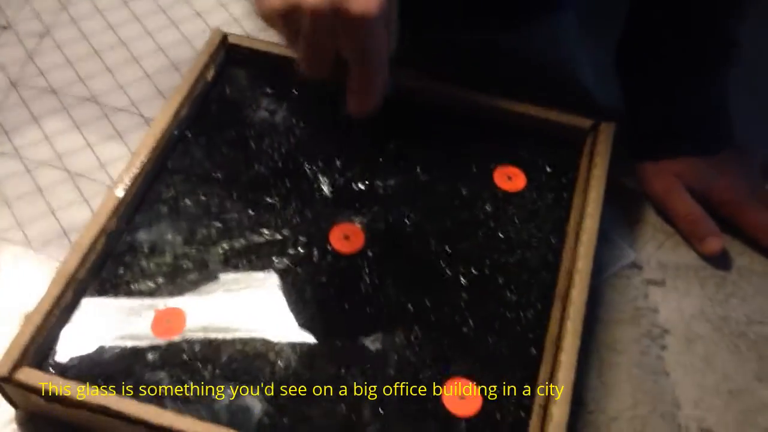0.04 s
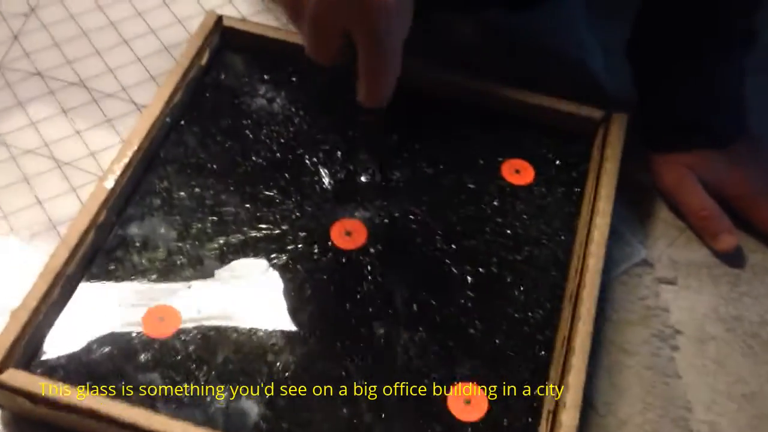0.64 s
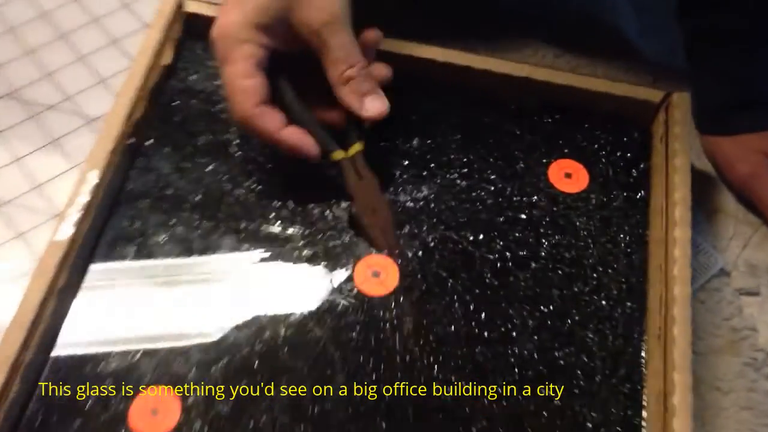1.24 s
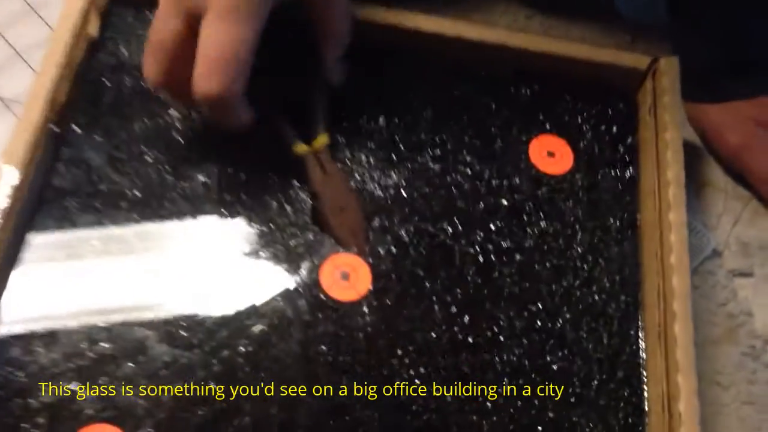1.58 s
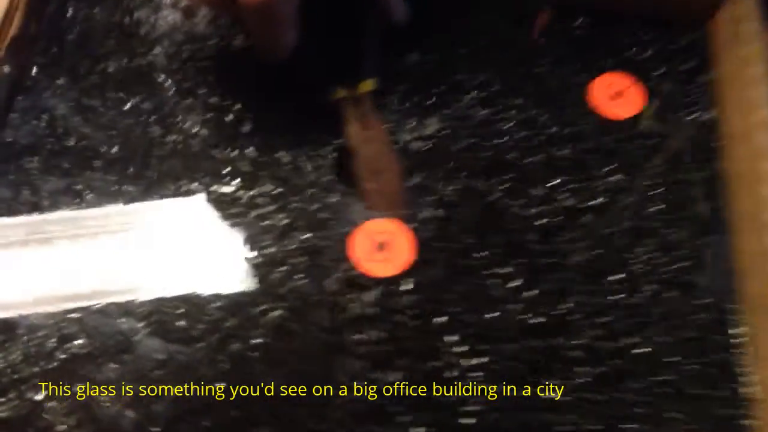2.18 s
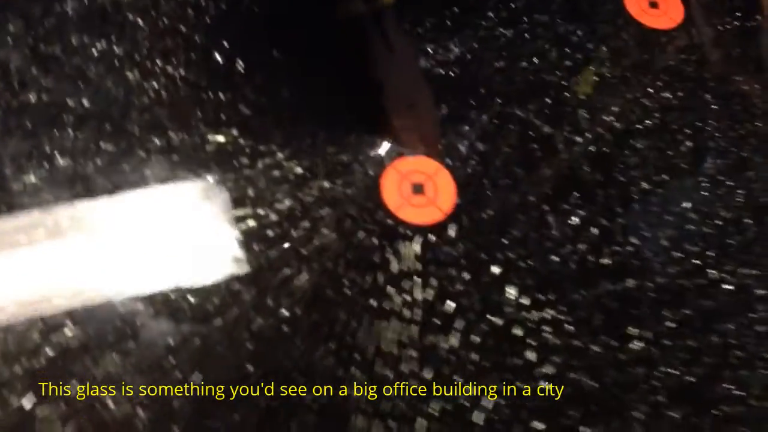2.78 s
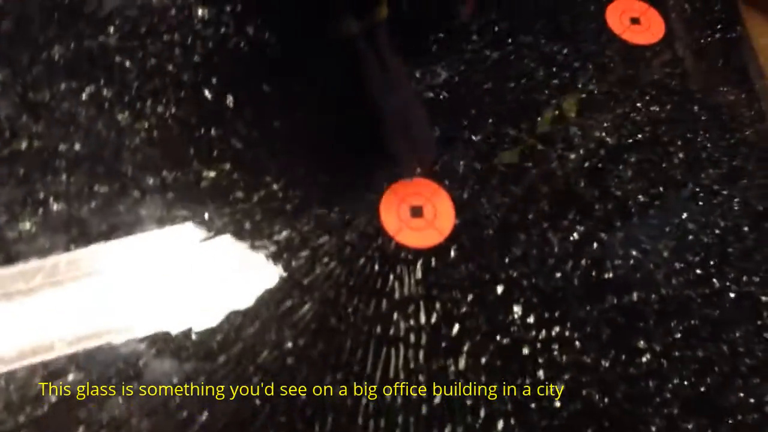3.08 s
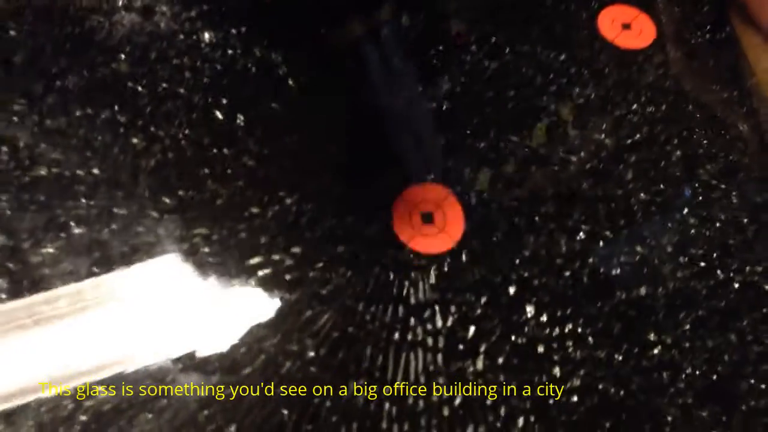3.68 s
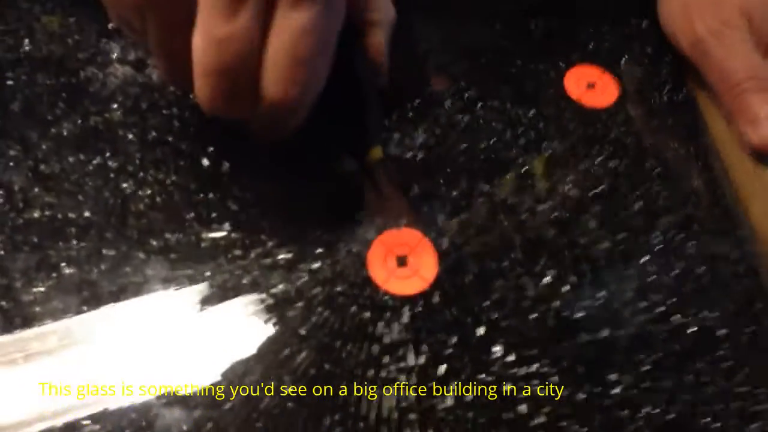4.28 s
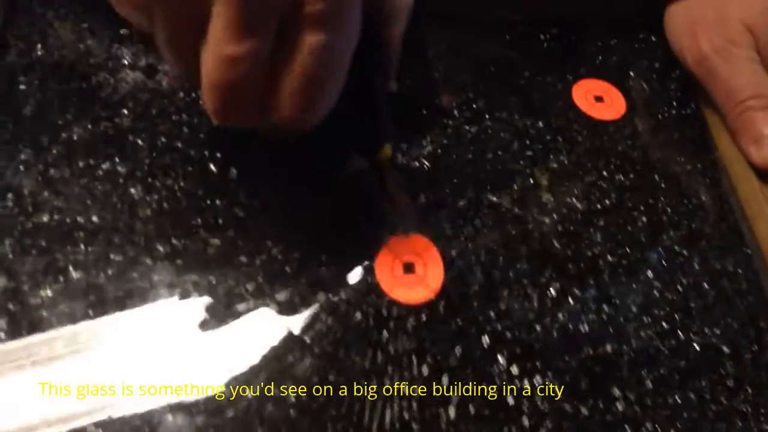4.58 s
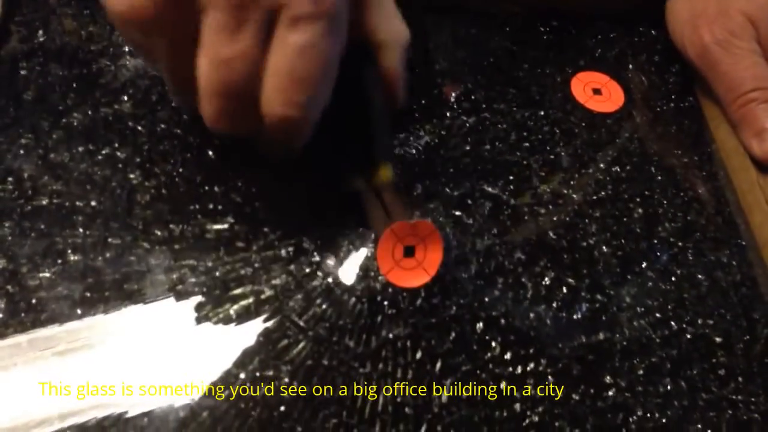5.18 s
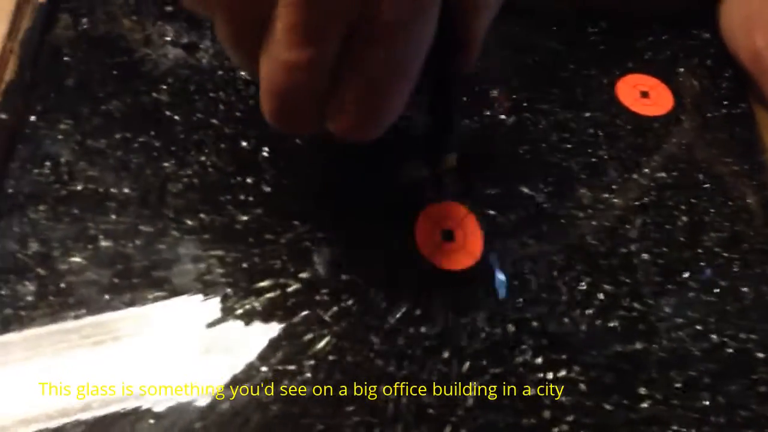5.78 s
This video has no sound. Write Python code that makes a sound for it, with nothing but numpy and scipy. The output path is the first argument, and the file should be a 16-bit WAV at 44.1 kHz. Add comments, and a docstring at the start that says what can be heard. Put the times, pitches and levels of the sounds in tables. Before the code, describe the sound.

In a quiet indoor space, close to the microphone, pliers pry at a sheet of cracked safety glass. First come several knocks and clicks, then softer taps. The metal then bites in and squeaks briefly, and crumbs of glass grind and crackle in uneven strokes. Small fragments keep breaking off with sharp snaps, each giving the pane a short thump, over a low steady hush.

```python
"""Pliers pick at a pane of shattered safety glass in a wooden tray, close by in a quiet, dry room.
First the jaws knock on the pane: each impact excites its modes, and a hard push rocks the tray.
Then they are twisted into it. Stick-slip friction makes the steel creak and squeak, crumbs grind
and fizz, and single pieces snap by brittle fracture, each snap thumping the whole pane."""
import sys
import numpy as np
from scipy import signal
from scipy.fft import rfft, irfft, next_fast_len
from scipy.io import wavfile

SR = 44100
rng = np.random.default_rng(int(sys.argv[2]) if len(sys.argv) > 2 else 0)


def bounce(signal):
    """Save signal as a 16-bit WAV file at the path given by the first command-line argument."""
    frames = np.transpose(np.atleast_2d(signal))
    limited = np.clip(frames, -1, 1)
    pcm = np.round(limited * 32767).astype(np.int16)
    wavfile.write(sys.argv[1], SR, pcm)


N = 266359
THUMP_HZ = 268.5  # lowest mode of the pane in its tray

# Higher modes of pane and pliers. Each row: frequency in Hz, relative level in dB,
# decay time in seconds before damping by the jaws.
HIGHER_MODES = [(733.7, 19.5, 0.031), (822.6, 14.5, 0.028), (1290, 10, 0.0083), (1560, 12, 0.013),
                (1735, 8.5, 0.048), (2050, 6.5, 0.03), (2490, 8, 0.02), (3370, 0.5, 0.005),
                (4350, -0.5, 0.013)]
# Spectrum of the crackle as heard, with the microphone's peak near 11 kHz.
# Each row: frequency in Hz, relative level in dB.
CRACKLE_SPECTRUM = [(1000, 4), (3000, -7), (4400, -6), (5600, -12.5), (7300, -9), (8800, -1.5),
                    (10800, 5.5), (12500, -0.5), (14500, -6), (16000, -14)]


def amp(db):
    return 10 ** (np.asarray(db) / 20)


def unit(x):
    return x / np.sqrt(np.mean(x ** 2) + 1e-20)


def peaked(x):
    return x / abs(x).max()


def add(mix, start, sound):
    part = mix[max(round(start * SR), 0):][:len(sound)]
    part += sound[:len(part)]


def colour(x, spectrum, size=4096):
    """Minimum-phase filter: clicks take on the spectrum and keep their sharp front."""
    hz, db = np.transpose(spectrum)
    log_hz = np.log(abs(np.fft.fftfreq(size, 1 / SR)) + 1)
    log_gain = np.log(amp(np.interp(log_hz, np.log(hz), db)))
    response = np.fft.ifft(np.exp(np.conj(signal.hilbert(log_gain)))).real
    return signal.fftconvolve(x, response[:size // 2])[:len(x)]


def wander(length, hz):
    """Random fluctuation: low-passed noise of rms 1."""
    size = next_fast_len(length, real=True)
    spectrum = rfft(rng.standard_normal(size)) / (1 + (np.fft.rfftfreq(size, 1 / SR) / hz) ** 4)
    return unit(irfft(spectrum, size)[:length])


def ring(x, hz, decay_s):
    """Resonance at a steady or drifting pitch: shift down to zero, smooth twice, shift back."""
    phase = 2 * np.pi * np.cumsum(hz * np.ones(len(x))) / SR
    carrier = np.exp(1j * phase)
    pole = np.exp(-np.log(1000) / (decay_s * SR))
    envelope = signal.lfilter([(1 - pole) ** 2], [1, -2 * pole, pole ** 2], x / carrier + 1e-18)
    return (carrier * envelope).real


def blow(thump_db, clack_db, crack_db, hz, t60, top_hz, chatter_db, size=5000):
    """Impulse response: the contact cracks, the higher modes clack and the lowest mode thumps."""
    t = np.arange(size) / SR
    rise_s, contact_s, crack_s, crumble_s = 0.002, 0.00072, 0.00046, 0.022
    swing = np.sin(2 * np.pi * hz * t) * (1 - np.exp(-(t / rise_s) ** 2)) * amp(-60 * (t / t60) ** 1.25)
    thump = signal.lfilter(*signal.butter(3, 125, "high", fs=SR), swing)  # small panes radiate little bass
    crumble = np.exp(-t / crumble_s)  # loose pieces go on chattering
    contact = rng.standard_normal(size) * (peaked(t * np.exp(-t / contact_s)) + amp(chatter_db) * crumble)
    modes = sum(amp(db) * unit(ring(contact, mode_hz * rng.uniform(0.927, 1.05), 0.34 * decay_s))
                for mode_hz, db, decay_s in HIGHER_MODES)  # damped by the firm contact
    clack = signal.lfilter(*signal.butter(4, top_hz, fs=SR), modes)
    burst = peaked(t * np.exp(-t / crack_s)) + amp(-15) * crumble
    crack = colour(rng.standard_normal(size) * burst, CRACKLE_SPECTRUM)
    return amp(thump_db) * peaked(thump) + amp(clack_db) * peaked(clack) + amp(crack_db) * peaked(crack)


def knocks(t60=0.042, hard_db=-11.5):
    """Free vibration: the jaws strike the pane, a softer contact than a break, so the clack is duller."""
    # Each row: start in seconds, thump, clack and crack levels in dB, pitch of the struck spot in Hz.
    impacts = [(0.0, -22, -30.5, -50, 270), (0.1492, -24, -32, -49, 673), (0.196, -9, -23.5, -25, 270),
               (0.449, -8.5, -26, -18.5, 268.5), (0.527, -24, -65, -56, 271), (1.01, -28, -24, -44, 267),
               (1.031, -19, -54, -30, 310), (1.195, -18, -33.5, -42, 264), (1.238, -15.5, -31, -57, 271),
               (1.256, -20.5, -30.5, -58, 321), (1.362, -31, -26.5, -36, 261),
               (1.488, -17, -35, -30.5, 310), (1.503, -19.5, -23.5, -52, 291), (1.515, -18, -56, -54, 282),
               (1.704, -29.5, -36.5, -37, 245), (1.744, -25.5, -36, -41, 315), (2.057, -27, -42, -45, 210),
               (2.244, -22, -29, -39, 292), (2.256, -21, -28.5, -49, 283)]
    out = np.zeros(N)
    for start, thump_db, clack_db, crack_db, hz in impacts:
        rebound = amp(0.63 * max(thump_db - hard_db, 0))  # jaws that bounce clear leave a longer ring
        ring_s = t60 * (THUMP_HZ / hz) ** 1.2 * rebound  # higher spots die faster
        add(out, start, blow(thump_db, clack_db, crack_db, hz, ring_s, top_hz=1760, chatter_db=-15.5))
    return out


def reflections(x, t60=0.12, per_s=3000, size=12000):
    """Reverberation: echoes from the table and walls merge into a short tail."""
    t = np.arange(size) / SR
    echoes = rng.standard_normal(size) * (rng.random(size) < per_s / SR)
    response = echoes * (t > 0.004) * amp(-60 * t / t60)
    return signal.fftconvolve(x, response / np.linalg.norm(response))[:N]


def background_hush():
    """Broadband noise: a steady hush, strongest in the bass, with a microphone hiss peak near 10 kHz."""
    # Each row: frequency in Hz, relative level in dB.
    spectrum = [(40, -10), (140, 0.5), (300, -7.5), (500, -14.5), (1000, -20.5), (3000, -27), (8000, -27.5),
                (10200, -18), (13000, -21), (15000, -27.5)]
    return amp(-55) * unit(colour(rng.standard_normal(N), spectrum))


def whine(hz=901):
    """Harmonic series: a camera whines faintly on unsteady upper multiples of one pitch."""
    noise = rng.standard_normal(N)
    return amp(-65.5) * unit(sum(k ** 2 * ring(noise, k * hz, 0.03) for k in range(7, 13)))


def rocking(top_hz=90, fade_s=0.034, size=12000):
    """Damped motion: a hard push rocks the tray on the table with a dull rumble."""
    # Each row: start in seconds, peak level in dB.
    pushes = [(0.2, -29), (2.588, -33), (5.497, -46)]
    out, t = np.zeros(N), np.arange(size) / SR
    for start, db in pushes:
        add(out, start, amp(db) * peaked(wander(size, top_hz) * np.sqrt(t) * np.exp(-t / fade_s)))
    return out


def ticks(size=4000):
    """Brief contacts have wide spectra: ticks and scuffs that hardly move the pane."""
    # Each row: start in seconds, peak level in dB, fade in seconds, low edge in Hz.
    contacts = [(0.2385, -12.5, 0.0028, 200), (0.266, -20.5, 0.0025, 80), (0.313, -31.5, 0.0025, 100),
                (0.454, -18.5, 0.018, 150), (0.4921, -15, 0.0014, 1210), (2.33, -28, 0.0065, 297),
                (2.432, -36.5, 0.0071, 300), (3.773, -31, 0.0041, 1200)]
    # Each row: frequency in Hz, relative level in dB.
    spectrum = [(60, 30), (800, 7), (1400, 1), (2900, -4.5), (6000, -13), (10500, -10.5), (16000, -17.5)]
    out, t = np.zeros(N), np.arange(size) / SR
    for start, db, fade_s, low_hz in contacts:
        burst = colour(rng.standard_normal(size) * np.exp(-t / fade_s), spectrum)
        tick = signal.lfilter(*signal.butter(2, low_hz, "high", fs=SR), burst)  # small chips have no bass
        add(out, start, amp(db) * peaked(tick))
    return out


def stroke_levels(bite_s=0.01, release_db_per_s=637):
    """Incoherent sources add in power: rumble, grit and fizz follow the force of the jaws' strokes."""
    # Each row: start and length in seconds, final force in dB, crushing (fizz over force) in dB,
    # change of force along the stroke in dB.
    strokes = [(1.018, 0.03, -37.5, -14, -5), (1.094, 0.02, -48, -8, -1), (1.226, 0.19, -44, -12, -3),
               (1.463, 0.072, -41.5, -13, 3.5), (1.551, 0.073, -46, -21, -7),
               (2.032, 0.08, -46, -5.5, -2.5), (2.227, 0.035, -31, -22.5, 10),
               (2.467, 0.14, -23, -11, 20.5), (2.697, .2, -44, -3.5, -6.5), (2.88, 0.71, -34.5, -4.5, 0.5),
               (3.592, 0.072, -41.5, -1, 11), (3.716, 0.28, -41.5, -24.5, 18),
               (4.008, 0.15, -24, -24.5, 18.5), (4.286, 0.041, -27, -6.5, 1.5),
               (4.357, 0.344, -32, -1, 9.5), (4.702, 0.1, -28.5, 1, 0.5), (4.827, 0.1, -36.5, -4, -9),
               (4.997, 0.039, -44, -1.5, -9), (5.059, 0.24, -39, -17.5, -1.5),
               (5.458, 0.047, -19.5, -11.5, 23.5), (5.522, 0.19, -38, -5.5, 5.5),
               (5.714, 0.16, -25.5, -8.5, 8.5), (5.977, 0.055, -41, -4.5, -1)]
    t, power = np.arange(N) / SR, np.zeros((3, N))
    for start, length, force_db, crush_db, build_db in strokes:
        bite = np.clip((t - start) / bite_s, 0, 1)
        to_go = np.clip(1 - (t - start) / length, 0, 1)
        release_db = release_db_per_s * np.clip(t - start - length, 0, 1)
        force = bite * amp(force_db - build_db * to_go - release_db)
        grit_db = -2.5 + 0.44 * crush_db
        power += np.outer(amp([0, grit_db, crush_db]), force) ** 2
    return np.sqrt(power)


def slip_train(length, per_s, spread_db):
    """Stick-slip: the load builds for an uneven while, then lets go in one click."""
    waits = rng.gamma(2, SR / per_s / 2, length)
    onsets = (np.cumsum(waits) - waits[0]).astype(int)
    train = np.zeros(length)
    train[onsets[onsets < length]] = 1
    return train * amp(spread_db * rng.uniform(-0.78, 1, length)) * rng.choice([-1, 1], length)


def clicks(per_s, spread_db):
    """Poisson process: independent clicks, mostly small and a few large."""
    strength = amp(spread_db * np.minimum(rng.exponential(1, N), 4.7)) * rng.choice([-1, 1], N)
    return strength * (rng.random(N) < per_s / SR)


def tinkle(t60=0.007):
    """Small bodies have high modes: jostled crumbs ring briefly, each at its own pitch."""
    out, t = np.zeros(N), np.arange(1200) / SR
    for hz in np.geomspace(7500, 14500, 32):
        ping = np.sin(2 * np.pi * hz * t) * amp(-60 * t / t60)
        out += signal.oaconvolve(clicks(per_s=80, spread_db=3.5), ping)[:N]
    return unit(out)


def grinding(chip_s=0.0016, creep_hz=9):
    """Forced vibration: slips and chips shake the pane and its modes while crumbs fizz and tinkle."""
    rumble, grit, fizz = stroke_levels()
    clumps = amp(2 * wander(N, hz=70))
    chips = unit(slip_train(N, per_s=75, spread_db=6.5))
    slips = unit(unit(clicks(per_s=1400, spread_db=3) * clumps) + 1.5 * chips)
    t = np.arange(400) / SR
    chip_bursts = unit(signal.fftconvolve(chips, t * np.exp(-t / chip_s))[:N] * rng.standard_normal(N))
    fractures = unit(clicks(per_s=6500, spread_db=4) * clumps)
    modes = np.zeros(N)
    # As the jaws creep to new contact points, the modes drift and take turns to come forward.
    for hz, db, decay_s in HIGHER_MODES:
        drift = 1 + 0.035 * wander(N, creep_hz)
        level = amp(db + 3 * wander(N, creep_hz))
        modes += level * unit(ring(slips, hz * drift, 0.6 * decay_s))
    breaking = unit(colour(fractures + 0.2 * chip_bursts, CRACKLE_SPECTRUM))
    ringing = unit(colour(tinkle() * clumps, CRACKLE_SPECTRUM))
    # Each row: frequency in Hz, relative level in dB.
    pane_response = [(25, -34), (80, -30), (165, 0), (270, 3.5), (390, -3), (520, -16.5), (1000, -34.5),
                     (3000, -55.5)]
    shaking = unit(colour(slips, pane_response))
    return rumble * shaking + grit * unit(modes) + fizz * unit(breaking + 0.85 * ringing)


def creaks(steel_hz=1740, decay_s=0.0075, tail=900):
    """Stick-slip of steel on glass: separate slips excite two modes, one wavering in pitch. The last row is no
    creak: the snap at 5.174 s leaves a brief ring near 2.55 kHz."""
    # Each row: start and length in seconds, pitch in Hz, peak level in dB, slips per second.
    slides = [(2.506, 0.073, 2300, -26.5, 87), (2.551, 0.057, 2305, -16, 180),
              (2.696, 0.035, 2360, -26, 162), (2.877, 0.052, 2490, -21.5, 100),
              (3.27, 0.33, 1650, -27.5, 68), (3.451, 0.063, 1545, -24.5, 220),
              (4.131, 0.048, 1795, -28.5, 148), (5.174, 0.0044, 2550, -18, 250)]
    out = np.zeros(N)
    for start, length, hz, db, per_s in slides:
        n = int(length * SR)
        slips = np.pad(slip_train(n, per_s, spread_db=-1.5) * (0.5 + np.hanning(n)), (0, tail))
        pitch = hz * (1 + 0.015 * wander(n + tail, per_s))
        rasp = ring(slips, pitch, decay_s) + amp(-7) * ring(slips, steel_hz, decay_s)
        add(out, start, amp(db) * peaked(rasp))
    return out


def snaps():
    """Brittle fracture: a piece gives way and thumps the pane, which the pressing jaws damp."""
    # Each row: start in seconds, then thump, clack and crack levels in dB.
    breaks = [(2.508, -22, -32, -45), (2.603, -15.5, -30, -41), (2.702, -31, -31, -50),
              (2.737, -12.5, -12, -20.5), (2.821, -19.5, -18, -26), (2.858, -15, -17.5, -22),
              (2.913, -21, -25, -30), (3.113, -26, -27, -19.5), (3.172, -11.5, -16.5, -29),
              (3.191, -27, -23, -25), (3.275, -28, -20, -28), (3.35, -11, -19.5, -31),
              (3.397, -12.5, -17.5, -18.5), (3.496, -17.5, -23, -16.5), (3.519, -25, -32, -29),
              (3.549, -25.5, -24, -40), (3.582, -21, -25.5, -22), (3.635, -35, -26.5, -25),
              (3.673, -20, -16.5, -20), (3.742, -25.5, -30, -39), (3.824, -22, -32, -32),
              (4.125, -22, -21, -28), (4.165, -25, -29, -38), (4.27, -36, -32, -24), (4.294, -21, -23, -42),
              (4.302, -28, -21, -40), (4.371, -24.5, -28, -19.5), (4.414, -24.5, -30, -49),
              (4.534, -17.5, -23, -20.5), (4.584, -12.5, -18, -18), (4.715, -14, -19, -25),
              (4.732, -9.5, -18, -22), (4.768, -5.5, -17, -27), (4.79, -9, -30, -24),
              (4.8212, -9.5, -11.5, -9), (4.84, -3.5, -12.5, -14), (4.917, -16, -23, -22),
              (4.984, -30, -28, -21), (5.023, -16, -29.5, -42), (5.099, -20, -45, -33),
              (5.174, -10.5, -13.5, -28.5), (5.264, -22, -26.5, -25.5), (5.282, -20, -44, -47),
              (5.303, -7.5, -22, -36), (5.476, -9, -20, -48), (5.495, -4, -41, -23),
              (5.773, -15, -22.5, -34), (5.795, -14.5, -33, -18.5), (5.832, -7.5, -27, -30),
              (5.852, -10.5, -21, -30), (5.868, -11, -18, -35), (5.896, -17.5, -27.5, -22)]
    out = np.zeros(N)
    for start, thump_db, clack_db, crack_db in breaks:
        hz = THUMP_HZ * rng.uniform(0.89, 1.24)
        add(out, start, blow(thump_db, clack_db, crack_db, hz, t60=0.025, top_hz=4300, chatter_db=-20))
    return out


def squeaks():
    """Self-excited oscillation: slips lock to a mode of the pliers and sing a short gliding tone."""
    # Each row: start and length in seconds, first and last pitch in Hz, level in dB.
    glides = [(2.735, 0.022, 2400, 2454, -21), (2.752, 0.022, 2480, 2548, -24.5),
              (2.783, 0.025, 2580, 2514, -35.5)]
    out = np.zeros(N)
    for start, length, first_hz, last_hz, db in glides:
        n = int(length * SR)
        phase = 2 * np.pi * np.cumsum(np.linspace(first_hz, last_hz, n)) / SR
        tone = np.sin(phase) + amp(-39) * np.sin(2 * phase)
        flutter = 1 + 0.15 * wander(n, hz=220)
        add(out, start, amp(db) * unit(tone * flutter * signal.windows.tukey(n, 0.35)))
    return out


def crushes():
    """Narrow-band noise: a crumb turns to powder between the jaws with a shrill, fading rasp."""
    # Each row: start and length in seconds, centre frequency in Hz, level in dB.
    crumbs = [(4.306, 0.021, 9840, -32), (5.49, 0.014, 12700, -32)]
    out = np.zeros(N)
    for start, length, hz, db in crumbs:
        n = int(length * SR)
        burst = rng.standard_normal(n) * np.sqrt(np.linspace(1, 0, n))
        add(out, start, amp(db) * unit(ring(burst, hz, decay_s=0.0012)))
    return out


def scene():
    """Superposition: glass and tool close by, their faint reflections and the background."""
    glass = knocks() + snaps() + ticks() + grinding() + creaks() + squeaks() + crushes() + rocking()
    return (glass + background_hush() + amp(-14) * reflections(glass) + whine())[None]


def record(dry, low_hz=60, top_hz=15300):
    """Band limiting: a small microphone thins the deep bass, and a steep filter cuts the top treble."""
    thinned = signal.lfilter(*signal.butter(2, low_hz, "high", fs=SR), dry)
    low_pass = signal.firwin(401, top_hz, window=("kaiser", 9), fs=SR)
    return signal.oaconvolve(thinned, low_pass[None], "same")


dry = scene()
out = record(dry)
bounce(out)
```